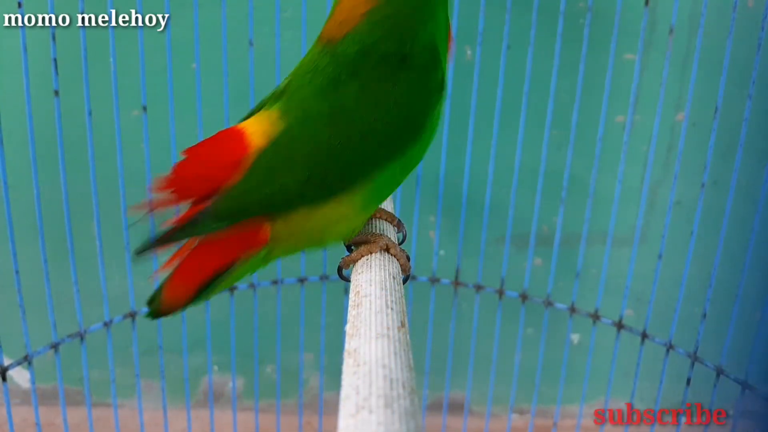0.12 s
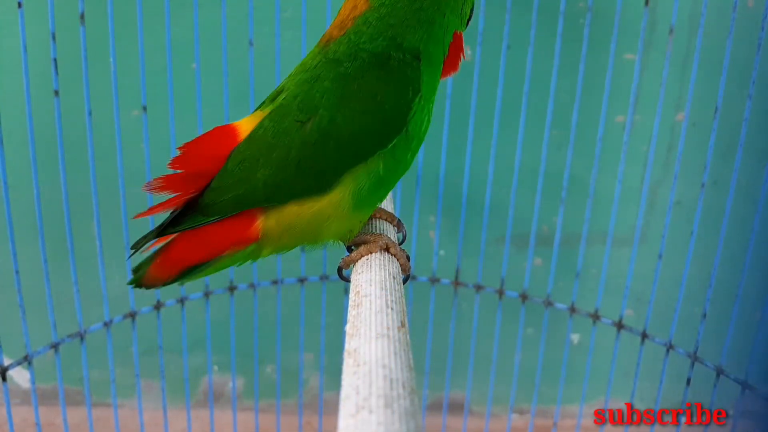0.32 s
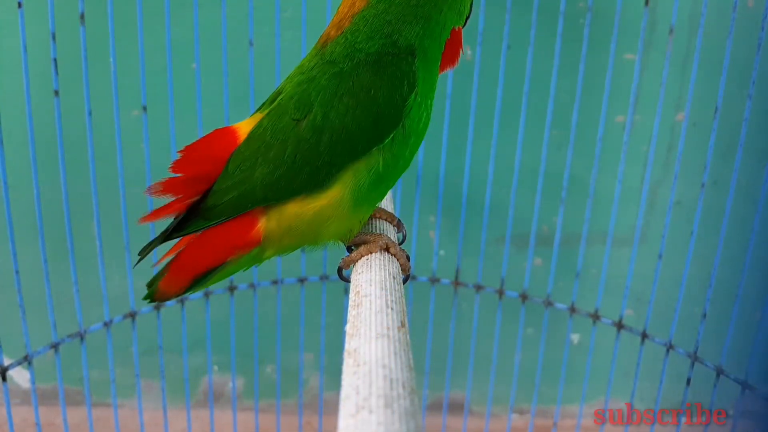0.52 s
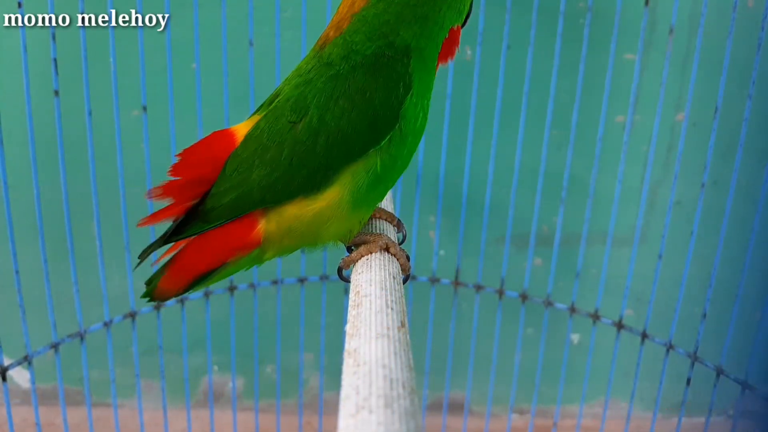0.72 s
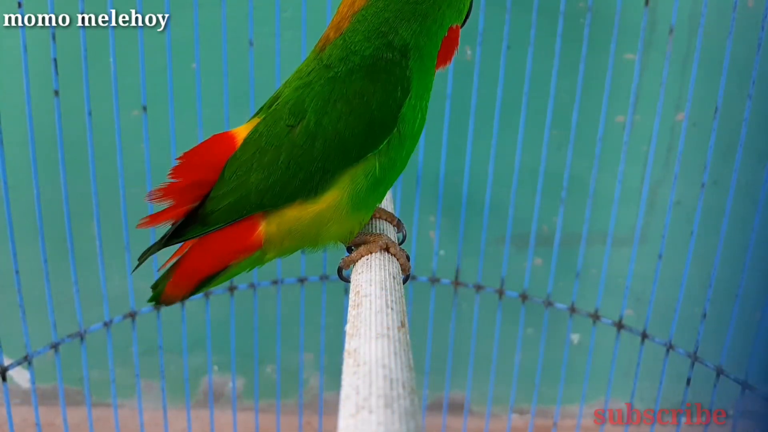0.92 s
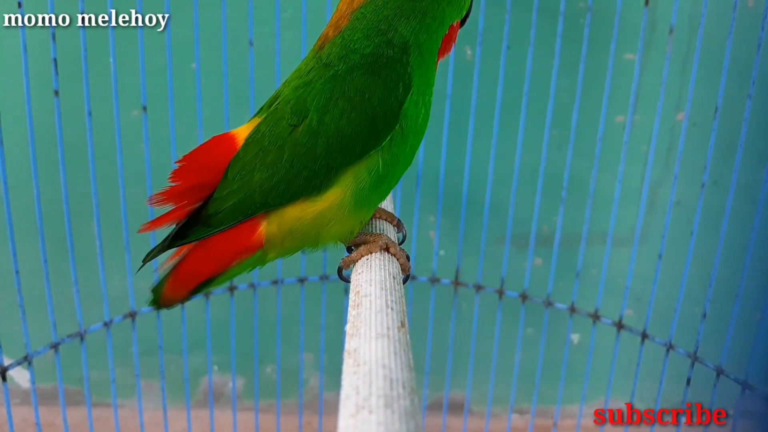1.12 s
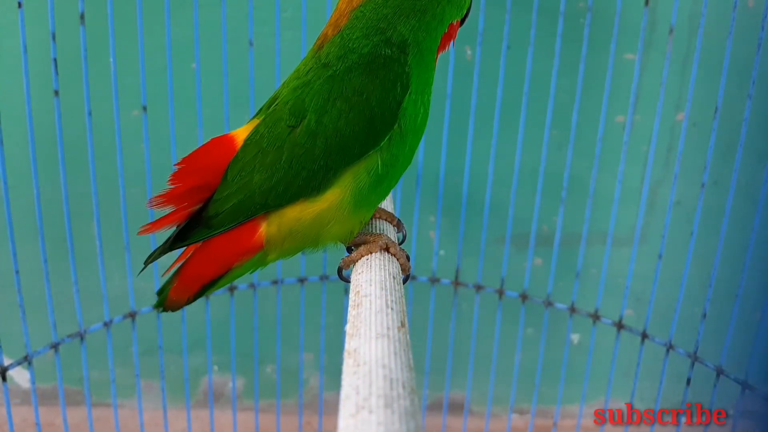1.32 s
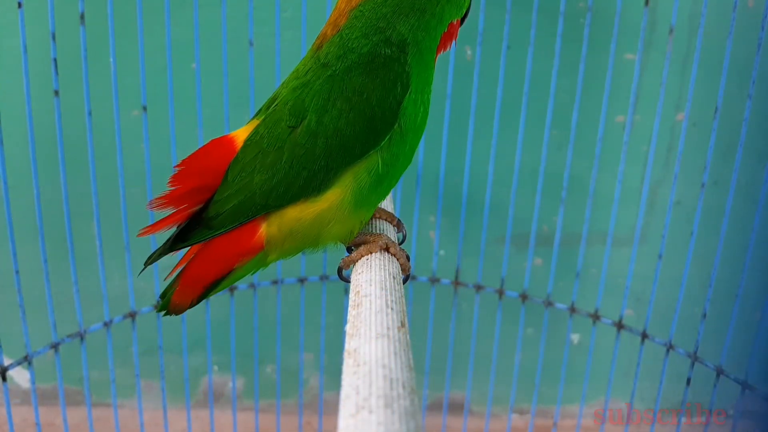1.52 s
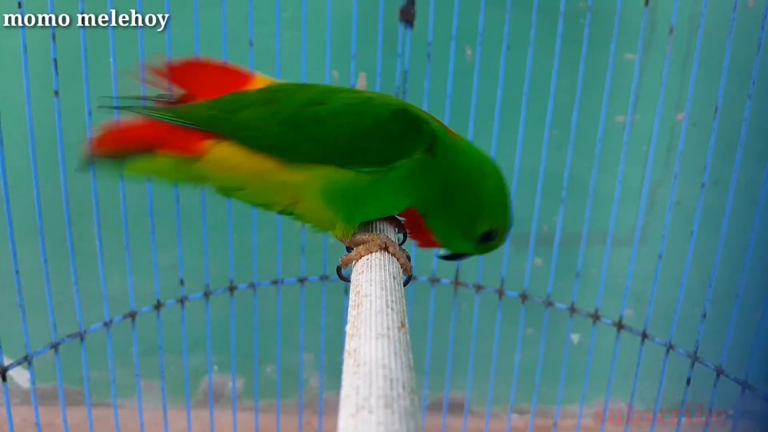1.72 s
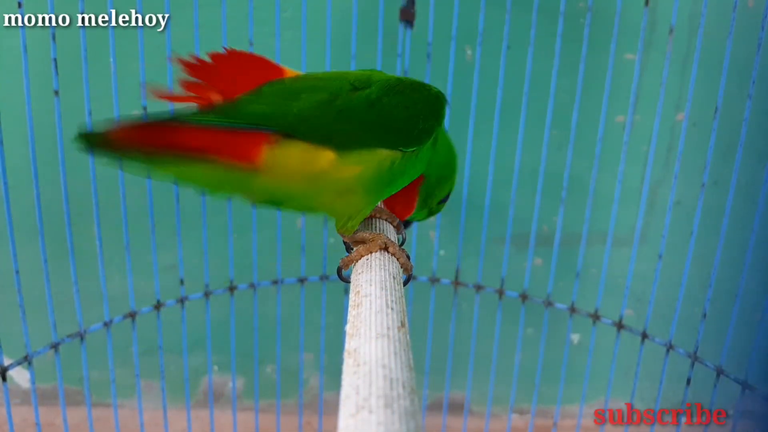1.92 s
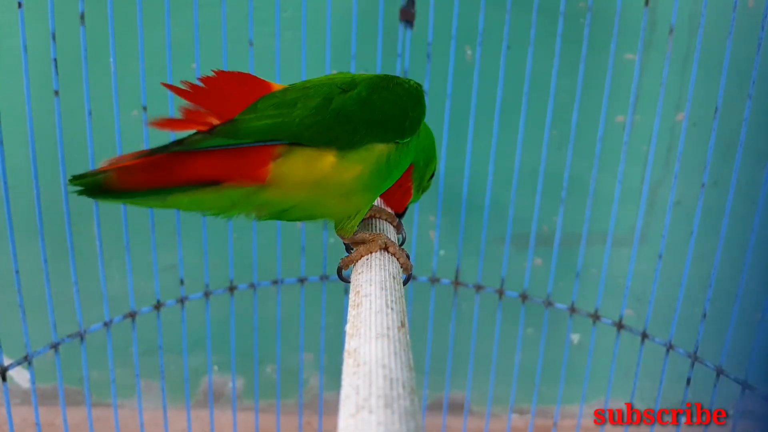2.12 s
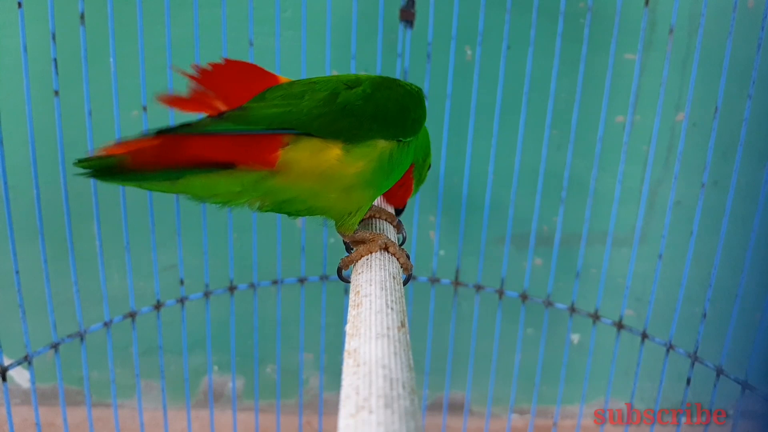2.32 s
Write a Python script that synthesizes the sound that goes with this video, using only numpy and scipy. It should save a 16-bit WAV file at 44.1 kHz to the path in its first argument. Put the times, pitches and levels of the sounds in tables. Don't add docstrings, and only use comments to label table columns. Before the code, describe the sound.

Close stereo microphones, slightly overdriven, catch shrill, nearly pure parrot chirps in a hard, echoing room; afterwards come a soft peep, feather rustle, tiny claw ticks and faint distant bird replies over low hum and hiss.

```python
import sys
import numpy as np
from scipy import signal
from scipy.fft import rfft, irfft
from scipy.io import wavfile
from scipy.ndimage import uniform_filter1d

SR = 44100
rng = np.random.default_rng(int(sys.argv[2]) if len(sys.argv) > 2 else 0)


def decibels_to_gain(level_db):
    exponent = np.asarray(level_db, float) / 20
    return 10 ** exponent


def to_wav(sig):
    pcm = np.clip(np.atleast_2d(sig), -1, 1) * 32767
    pcm = np.round(pcm).astype(np.int16)
    wavfile.write(sys.argv[1], SR, pcm.T)


N = 110250

# (time from its start [s], pitch [Hz], level [dB])
LEAD = [(0, 7150, -30), (.006, 7100, -17), (.014, 6950, -11), (.018, 5700, -18), (.024, 6600, -26),
        (.032, 7300, -15)]
HOLD = [(0, 7330, -19), (.012, 7220, -11), (.052, 7215, -8), (.066, 7260, -14), (.09, 7290, -12),
        (.1, 7190, -10), (.131, 7165, -7.5), (.137, 6250, -19), (.152, 4850, -18)]
REGAIN = [(0, 4859, -11), (.005, 6006, -22), (.010, 6900, -10), (0.026, 7210, -7.5), (0.051, 7008, -2.5),
          (.068, 7050, -7.5), (.075, 7123, -7), (.08, 7056, -35.5)]
ARCH = [(0, 2833, -38), (.007, 3124, -27.5), (.011, 4427, -34.5), (.016, 5830, -24), (.026, 6180, -29),
        (.04, 6450, -17.5), (0.07, 7262, -8.5), (.087, 6750, -11), (.097, 6027, -24), (0.104, 5118, -37),
        (.111, 4684, -30)]
WARBLE = [(0, 4755, -22.5), (.005, 5482, -37), (.013, 6418, -18), (.021, 5784, -24), (.028, 4953, -23),
          (0.039, 6860, -8.5), (0.046, 5706, -13), (0.051, 7834, -13.5), (0.056, 7951, -6.5),
          (0.062, 8050, -13.5), (0.072, 7944, -34.5)]
SHORT = [(0, 6120, -60), (.006, 6444, -26.5), (0.014, 6770, -19), (0.021, 6900, -30), (0.034, 7330, -31.5),
         (0.049, 6740, -45), (0.058, 4750, -34.5), (0.063, 4290, -50), (0.069, 4050, -43.5),
         (0.074, 4050, -54)]
PEEP = [(0, 2760, -72.5), (.006, 3090, -61), (.009, 4110, -58), (0.013, 3945, -72), (0.019, 3070, -56.5),
        (0.027, 4120, -46), (0.034, 6770, -43.5), (.07, 6850, -48), (0.084, 5800, -48.5),
        (0.099, 5250, -69.5)]
ANSWER = [(0, 6400, -50.5), (.015, 6600, -38.5), (.03, 6300, -39), (0.047, 6550, -33), (0.098, 6767, -38),
          (.14, 6900, -35.5), (.16, 6900, -42.5), (.17, 6900, -37)]
REPLY = [(0, 6500, -39), (.01, 6400, -46), (.03, 6350, -38), (.044, 6400, -44), (.053, 6450, -36),
         (.075, 6550, -33.5), (.1, 6750, -45.5), (.14, 6850, -41), (.18, 6900, -45)]


def rms_one(x):
    return x / np.sqrt(np.mean(x ** 2) + 1e-20)


def in_time(rows):
    return np.interp(np.arange(N) / SR, *np.transpose(rows))


def drift(rate_hz):
    r = np.exp(-2 * np.pi * rate_hz / SR)
    noise = rng.standard_normal(N + SR)
    return rms_one(signal.lfilter([1], [1, -2 * r, r * r], noise)[SR:])


def coloured(points, alike):
    hz = np.arange(1, N // 2 + 2) * SR / N
    at, db = np.transpose(points)
    gain = decibels_to_gain(np.interp(np.log(hz), np.log(at), db, left=-90, right=db[-1] - 12.5))
    mid, side = irfft(rfft(rng.standard_normal((2, N))) * gain, N)
    return rms_one(np.sqrt(1 + alike) * mid + np.sqrt(1 - alike) * side * [[1], [-1]])


def left_right(db):
    return decibels_to_gain(db / 2 * np.array([[1], [-1]]))


def background():
    # (time [s], level [dB])
    swell_rows = [(0.0, -61), (0.41, -50.5), (0.85, -55), (1.05, -64.5), (1.29, -63), (1.73, -62),
                  (2.43, -57), (2.5, -55.5)]
    # (frequency [Hz], level [dB])
    hum_colour = [(26, -32.5), (45, -13), (131, -8.5), (253, -23), (412, -33), (479, -42.5), (589, -28.5),
                  (908, -69.5), (4000, -65.5), (5200, -95), (8800, -120)]
    # (frequency [Hz], level [dB])
    hiss_colour = [(2350, -57.5), (4000, -20), (5750, -25.5), (6830, -16), (8210, -25.5), (15800, -19.5)]
    chorus_hz, chorus_width_hz = 6900, 500
    swell = in_time(swell_rows)
    hum_db = -56 + swell - swell.mean() + 4.57 * drift(0.67)
    hum = decibels_to_gain(hum_db) * left_right(-4) * coloured(hum_colour, alike=0.1)
    chorus_colour = [(chorus_hz - 2 * chorus_width_hz, -30), (chorus_hz - 200, -3), (chorus_hz, 0),
                     (chorus_hz + chorus_width_hz, -12), (chorus_hz + 1500, -22)]
    chorus = decibels_to_gain(-71 + 2.5 * drift(43)) * coloured(chorus_colour, alike=0.29)
    hiss = decibels_to_gain(-74.5) * coloured(hiss_colour, alike=0.1)
    return hum + chorus + hiss


def room(x):
    room_t60_s, late_t60_s, late_db, gap_s = 0.23, 0.72, -48.5, 0.004
    t = np.arange(SR) / SR
    fade = decibels_to_gain(-60 * t / room_t60_s) + decibels_to_gain(late_db - 60 * t / late_t60_s)
    fade = rms_one(fade * (t > gap_s))
    echoes = fade / np.sqrt(SR) * rng.standard_normal((2, SR))
    return signal.fftconvolve(x[None], echoes, axes=1)[:, :N]


def whistle(calls, direct_db, room_db, extra_breath_db=0):
    # (frequency [Hz], level [dB per Hz])
    breath_colour = [(900, -22), (2300, -11), (2950, -3.5), (3900, -6.5), (4300, -14), (5000, -13.5),
                     (8250, 10.5), (8700, -44), (10800, -12.5), (13000, -3.5)]
    # (time [s], depth [0-1])
    tremor_depth = [(.235, 0.08), (.255, 0.11), (.3, 0.03), (.315, 0.44), (.335, 0.22), (.37, 0.01),
                    (.385, 0.03)]
    edge_s = 0.00085
    t = np.arange(N) / SR
    hz, gain, pan = np.full(N, 7000.), np.zeros(N), np.zeros(N)
    for start, shape, level_db, factor, pan_db in calls:
        s, pitch, db = np.transpose(shape)
        on = (t >= start) & (t < start + s[-1] + edge_s)
        hz[on] = factor * np.interp(t[on] - start, s, pitch)
        gain[on] = decibels_to_gain(level_db + np.interp(t[on] - start, s, db))
        pan[on] = pan_db
    hz, gain, pan = (uniform_filter1d(v, size=int(edge_s * SR)) for v in (hz, gain, pan))

    phase = np.cumsum(2 * np.pi * hz * (1 + 0.004 * drift(60)) / SR)
    effort_db = 20 * np.log10(gain + 1e-4) + 10
    octaves_below = np.log2(7000 / hz)
    rich_db = 30 * octaves_below + 0.21 * effort_db
    second = decibels_to_gain(-22 + rich_db) * np.sin(2 * phase + 0.4 * drift(370))
    third = decibels_to_gain(-30 + rich_db) * np.sin(3 * phase + 0.4 * drift(710))
    tone = np.sin(phase) + second + third * (hz < 5200)

    airy_db = 6 * octaves_below + 2 * drift(40)
    breath_db = -35 + extra_breath_db - 0.9 * effort_db + airy_db
    breath = decibels_to_gain(breath_db) * coloured(breath_colour, alike=0.26)[0]
    voice = gain * decibels_to_gain(1.2 * drift(230)) * (tone + breath)

    beat = np.cumsum(2 * np.pi * 520 * (1 + 0.055 * drift(40)) / SR)
    voice *= 1 + in_time(tremor_depth) * (np.sin(beat) + 0.6 * drift(45) * np.sin(beat / 2))
    return decibels_to_gain(direct_db) * left_right(pan) * voice + decibels_to_gain(room_db) * room(voice)


def near_bird():
    # (start [s], shape, level [dB], pitch factor, left-right [dB])
    near_calls = [
        (.208, LEAD, 2, 1.0, -2),
        (.24, HOLD, 2.5, 1.0, 1.5),
        (.392, REGAIN, -3, 1.0, -3),
        (.578, ARCH, -2, 1.0, 2.5),
        (.69, WARBLE, -2, 1.0, -5.5),
        (.832, ARCH, -5, 1, -3),
        (.942, WARBLE, -7.5, 0.98, -8.5),
        (1.212, SHORT, 2.5, 0.98, 0.5),
    ]
    return whistle(near_calls, direct_db=-1.87, room_db=-6)


def perch():
    # (time [s], level [dB])
    shuffle = [(1.7, -74.5), (1.745, -61.5), (1.82, -67), (1.9, -70), (1.915, -56.5), (1.97, -59.5),
               (2.05, -60), (2.1, -55.5), (2.15, -62), (2.24, -54.5), (2.3, -62), (2.5, -65.5)]
    # (frequency [Hz], level [dB per Hz])
    rustle_colour = [(300, -1), (1000, -10.5), (2500, -15), (5000, -13.5), (7500, -7), (8600, -11),
                     (11000, -13.5), (15500, -25.5)]
    # (time [s], level [dB])
    sheen = [(1.7, -1), (1.82, -1.5), (1.9, 1), (1.95, -2), (2.03, -1), (2.12, -10.5), (2.5, -4)]
    # (time [s], peak level [dB])
    ticks = [(1.9113, -52), (1.9165, -56), (1.922, -48), (1.9278, -48.5), (1.936, -52), (1.9477, -48.5),
             (1.987, -38), (2.0217, -63.5), (2.097, -51.5), (2.104, -64)]
    # (frequency [Hz], level [dB], time to fade by 60 dB [s])
    tick_modes = [(1107, -21, 0.27), (4015, 0, 0.011), (5500, 2, 0.004), (8450, 15, 0.0016),
                  (11730, -2.5, 0.0017), (13750, -7, 0.0022)]
    rustle = decibels_to_gain(in_time(shuffle) + 0.99 * drift(5.7)) * coloured(rustle_colour, alike=0.1)
    treble = signal.sosfiltfilt(signal.butter(4, 8000, "high", fs=SR, output="sos"), rustle)
    rustle += (decibels_to_gain(in_time(sheen)) - 1) * treble

    s, db = np.transpose(ticks)
    ringing = np.zeros(N)
    for hz, level_db, t60 in tick_modes:
        r, w = decibels_to_gain(-60 / (t60 * SR)), 2 * np.pi * hz / SR
        clicks = np.full(N, 1e-18)
        clicks[(s * SR).astype(int)] = decibels_to_gain(db + level_db - 4.0 + rng.normal(0, 0.93, len(s)))
        ringing += signal.lfilter([0, np.sin(w)], [1, -2 * r * np.cos(w), r * r], clicks)
    return rustle + left_right(-3) * ringing + decibels_to_gain(-5) * room(ringing)


def turned_peep():
    # (start [s], shape, level [dB], pitch factor, left-right [dB])
    mutter_calls = [
        (1.718, PEEP, 0.86, 0.95, 0),
    ]
    return whistle(mutter_calls, direct_db=-3, room_db=-3, extra_breath_db=-13)


def far_birds():
    # (start [s], shape, level [dB], pitch factor, left-right [dB])
    far_calls = [
        (2.118, ANSWER, 2, 1.0, 2.5),
        (2.325, REPLY, 3, 1.0, -11.5),
    ]
    far = whistle(far_calls, direct_db=-3, room_db=-2.5, extra_breath_db=-27.5)
    return signal.sosfilt(signal.butter(3, 9000, fs=SR, output="sos"), far)


def scene():
    return background() + near_bird() + perch() + turned_peep() + far_birds()


def overload(x):
    capsule_hz, capsule_width_hz = 8327, 1675
    r = np.exp(-np.pi * capsule_width_hz / SR)
    turn = 2 * r * np.cos(2 * np.pi * capsule_hz / SR)
    drive = signal.lfilter([(1 - r * r) / 2, 0, (r * r - 1) / 2], [1, -turn, r * r], x)
    bent = decibels_to_gain([[-12], [3]]) * drive ** 2
    flutter = signal.sosfilt(signal.butter(2, [77, 967], "band", fs=SR, output="sos"), bent)
    overtones = signal.sosfilt(signal.butter(2, 2000, "high", fs=SR, output="sos"), bent)
    return np.tanh(x) + overtones + decibels_to_gain(5.5) * flutter


def band_limit(x):
    return signal.sosfilt(signal.butter(12, 16610, fs=SR, output="sos"), x)


def record(dry):
    hz = np.arange(N // 2 + 1) * SR / N
    lag = 1.383 / (1 + (hz / 11500) ** 10)
    right = irfft(rfft(dry[1]) * np.exp(-2j * np.pi * hz * lag / SR), N)
    x = overload(np.array([dry[0], right]))
    x = signal.sosfilt(signal.cheby2(12, 70, 16500, fs=SR, output="sos"), x)
    x = signal.sosfilt(signal.butter(2, 45, "high", fs=SR, output="sos"), x)
    return band_limit(x)


dry = scene()
out = record(dry)
to_wav(out)
```